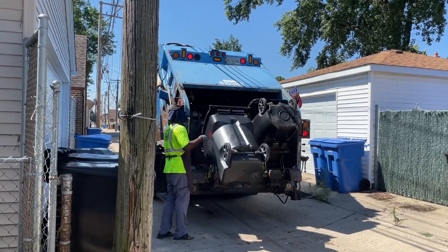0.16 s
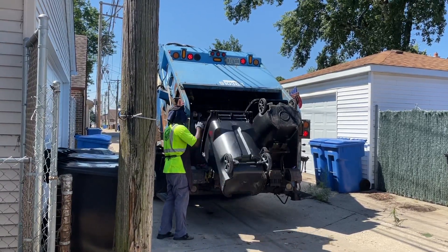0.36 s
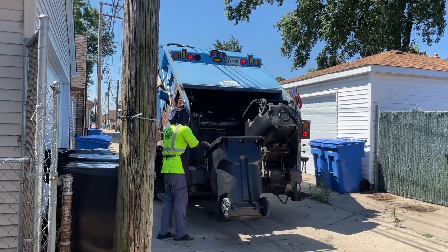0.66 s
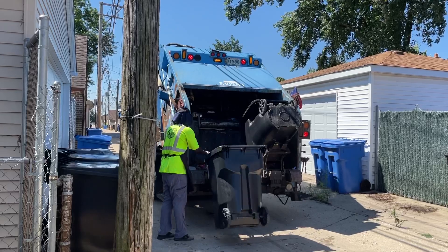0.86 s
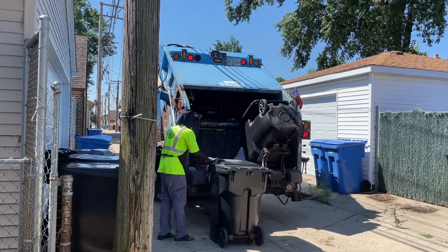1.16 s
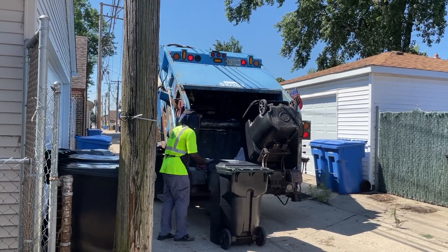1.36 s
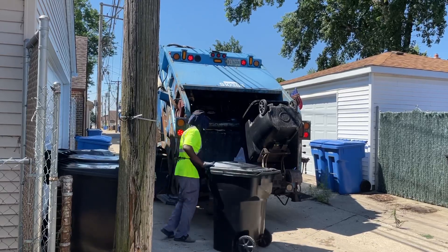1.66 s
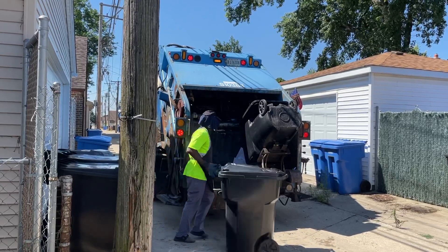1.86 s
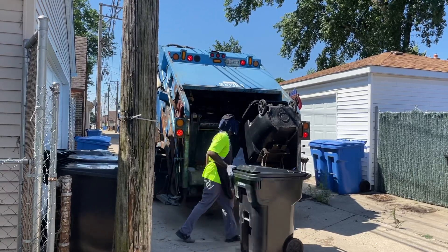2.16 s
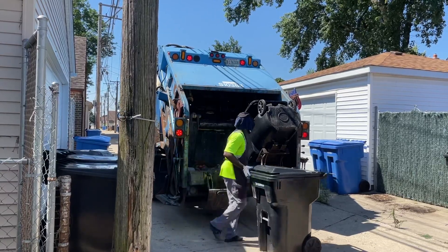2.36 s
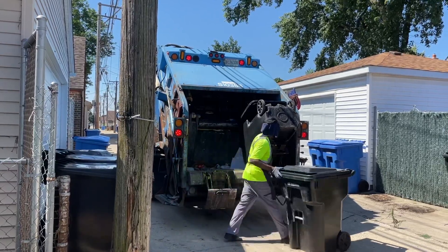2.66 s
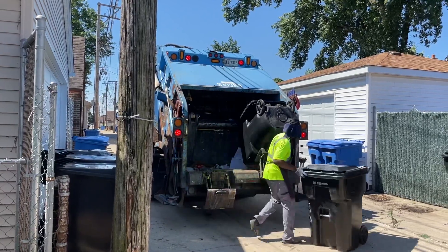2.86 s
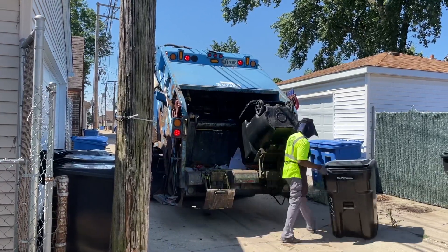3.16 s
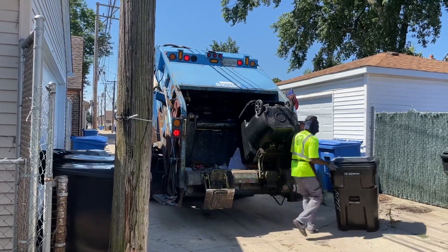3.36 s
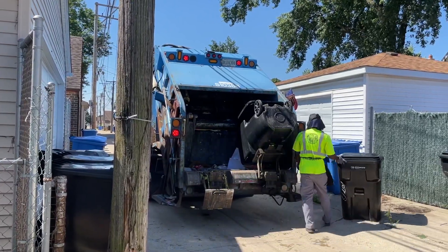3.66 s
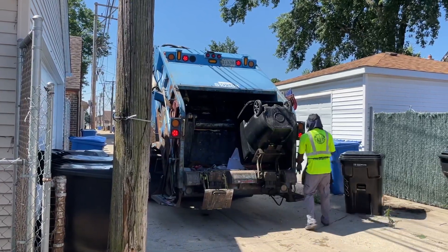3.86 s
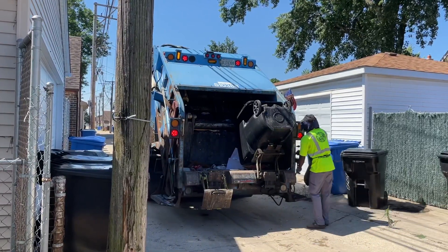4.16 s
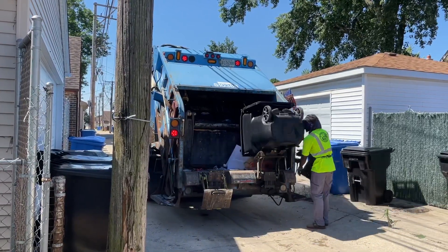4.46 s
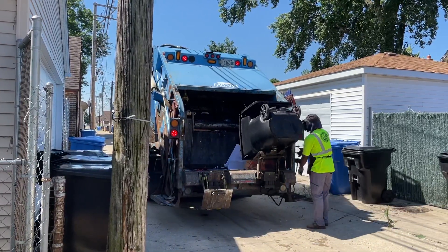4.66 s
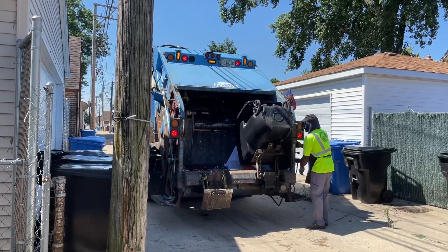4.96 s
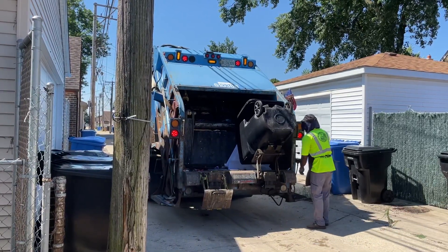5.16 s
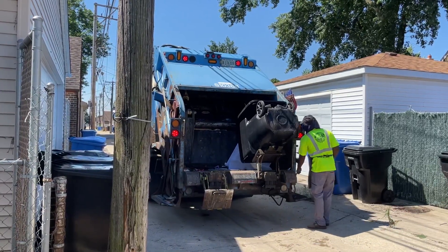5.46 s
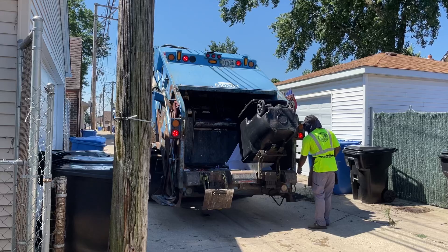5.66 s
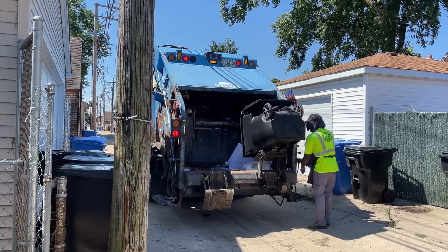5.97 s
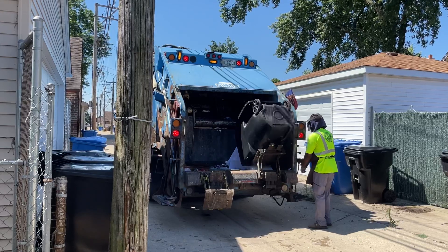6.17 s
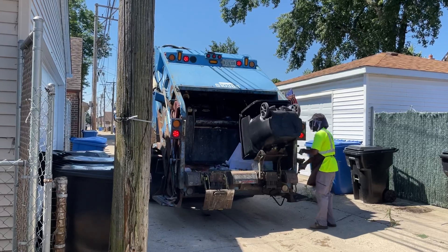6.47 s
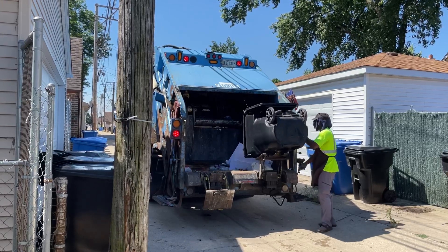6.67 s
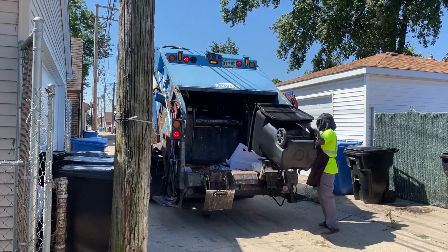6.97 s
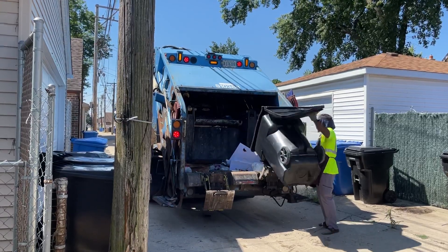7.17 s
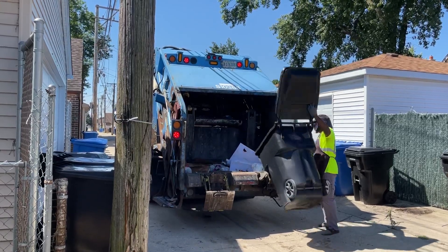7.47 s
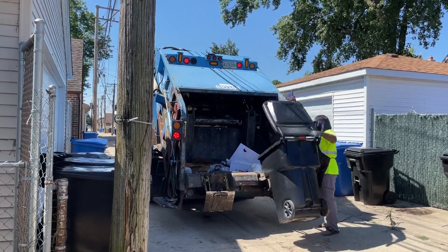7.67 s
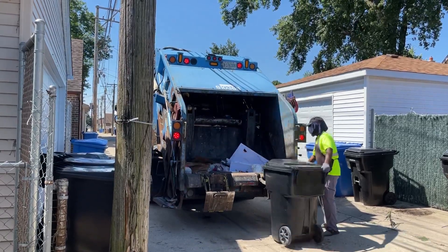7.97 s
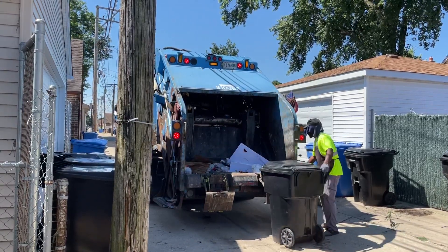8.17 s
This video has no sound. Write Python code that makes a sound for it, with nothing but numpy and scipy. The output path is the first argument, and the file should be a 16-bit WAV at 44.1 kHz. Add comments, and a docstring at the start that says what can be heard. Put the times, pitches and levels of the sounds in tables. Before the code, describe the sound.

A refuse truck's low engine throbs steadily in a narrow alley. A hydraulic pump whines as an emptied plastic cart is lowered and lands with a hard bang. It is wheeled away, rumbling and scraping over rough concrete, then the lifter jolts a second cart with clustered hollow thuds and clanks. After a short calm with rushing oil, that cart lands in two heavy hits. Close stereo microphone, short wall echoes, loud hits slightly ducking the rest.

```python
"""Refuse truck with two carts

A refuse truck idles in an alley while its hydraulic lifter lowers two emptied plastic carts.
The first cart lands and is wheeled over rough concrete; the second is shaken on the hopper, then lands.
Engine, oil rush and rolling are filtered noise; pump whine and squeaks are sines.
Blows and clinks are dying tones and noise bursts, and random echoes make the alley.
Two close microphone ports hear it, with gain control."""
import sys
import numpy as np
from scipy import signal
from scipy.fft import rfft, irfft, next_fast_len
from scipy.io import wavfile
from scipy.ndimage import uniform_filter1d

SR = 44100
rng = np.random.default_rng(int(sys.argv[2]) if len(sys.argv) > 2 else 0)


def wav_record(signal):
    """Record a signal, one row per channel, as 16-bit PCM in the file named by sys.argv[1]."""
    frames = np.transpose(np.atleast_2d(signal))
    bounded = np.clip(frames, -1, 1)
    # unit amplitude maps onto the largest positive 16-bit level
    quanta = np.round(bounded * 32767).astype(np.int16)
    wavfile.write(sys.argv[1], SR, quanta)


def ratio_of_db(decibels):
    """Turn decibels (scalar or array-like) into linear amplitude factors; 0 dB maps to 1."""
    return 10 ** (np.asarray(decibels, float) / 20)


N = 367000  # length in samples


def evened(x):
    """Scales a sound to rms 1."""
    return x / np.sqrt(np.mean(x ** 2) + 1e-20)


def read(points, hz):
    """Reads a table of values over frequency, on a log-frequency axis."""
    f, value = np.transpose(points)
    return np.interp(np.log(hz + 1), np.log(f + 1), value)


def curve(rows):
    """Joins the rows of a table with straight lines over all samples."""
    s, *columns = np.transpose(rows)
    return [np.interp(np.arange(N) / SR, s, c) for c in columns]


def spans(rows):
    """Sums envelopes in dB from rows (start s, rise s, hold s, fall s, dB)."""
    t = np.arange(N) / SR
    total_db = np.zeros(N)
    for s, rise, hold, fall, db in rows:
        corners = s + np.cumsum([0, rise, hold, fall])
        total_db += np.interp(t, corners, [0, db, db, 0])
    return total_db


def add(mix, s, sound):
    """Mixes a sound in at a time in seconds."""
    part = mix[round(s * SR):][:len(sound)]
    part += sound[:len(part)]


def coloured(x, gain):
    """Filters by gain(hz) along the last axis."""
    size = next_fast_len(x.shape[-1])
    spectrum = rfft(x, size) * gain(np.fft.rfftfreq(size, 1 / SR))
    return irfft(spectrum, size)[..., :x.shape[-1]]


def peaks(modes):
    """Gain of steep resonances side by side, from rows (Hz, width Hz, dB)."""
    return lambda hz: np.sqrt(sum(ratio_of_db(2 * db) / (1 + (2 * (hz - f) / w) ** 2) ** 2 for f, w, db in modes))


def lumps(width_s, channels=2):
    """Slow random wander of rms 1, made by smoothing noise twice."""
    size = max(round(width_s * SR), 2)
    noise = rng.standard_normal((channels, N))
    return evened(uniform_filter1d(uniform_filter1d(noise, size), size))


def ring(hz, db, t60, rise_s, sag=0., size=2 ** 14):
    """One dying tone; a large swing starts it sharp by the share sag."""
    t = np.arange(size) / SR
    t60 = max(t60, .004)
    turns = np.cumsum(hz * (1 + sag * ratio_of_db(-120 * t / t60))) / SR
    shape = (1 - np.exp(-t / rise_s)) * ratio_of_db(-60 * t / t60)
    return ratio_of_db(db) * shape / shape.max() * np.sin(2 * np.pi * turns)


def burst(noise, gain, db, rise_s, t60, chatter_db=0.):
    """Coloured noise that rises fast and dies away; loose parts make it chatter."""
    t = np.arange(len(noise)) / SR
    shape = (1 - np.exp(-t / rise_s)) * ratio_of_db(-60 * t / max(t60, .015))
    chatter = evened(uniform_filter1d(uniform_filter1d(noise[::-1], size=120), size=120))
    loosened = np.minimum(t / .012, 1)  # the first contact is firm
    x = coloured(noise, gain) * shape * ratio_of_db(chatter_db * chatter * loosened)
    same_energy = np.sqrt(np.sum(shape ** 2) / np.sum(x ** 2))
    return ratio_of_db(db) * x * same_energy / shape.max()


# Colour of engine and fan noise off the alley walls: f/Hz, relative level/dB per Hz
ENGINE_TONE = [(25, -26), (55, -1), (80, -5.5), (120, -12), (250, -15), (440, -12), (540, -24.5),
               (720, -26), (900, -14.5), (1020, -9), (1160, -19), (1330, -29), (1500, -27.5), (3300, -32),
               (5600, -43), (6500, -61.5), (9000, -42), (15000, -55)]


def engine():
    """Noise that throbs with every firing, each cylinder with its own strength."""
    engine_db, firing_hz = -29.5, 35.8  # overall rms level, mean firing rate
    turns = np.cumsum(firing_hz * (1 + 0.012 * lumps(.3, channels=1)[0])) / SR
    cylinder_db = 2.0 * rng.standard_normal(6)[turns.astype(int) % 6]
    throb = 1 + 0.56 * ratio_of_db(cylinder_db) * np.exp(-(turns % 1) / 0.13)
    noise = throb * rng.standard_normal((2, N))
    return ratio_of_db(engine_db) * evened(coloured(noise, lambda hz: ratio_of_db(read(ENGINE_TONE, hz))))


# Thin tones: long ones whine from the oil pump, short ones are squeaks:
# start t/s, end t/s, mean f/Hz, rms level/dB before wavering
THIN_TONES = [(.17, 1.08, 214, -31), (0, .8, 3240, -51), (3.38, 3.51, 3260, -40), (3.92, 4.1, 3260, -46),
              (4.11, 4.2, 2060, -43), (7.2, 7.9, 150.7, -37), (7.2, 7.9, 301.5, -40), (7.2, 7.9, 452, -43),
              (6.8, 8.3, 3690, -57)]


def whine_and_squeaks():
    """Nearly steady sine tones whose pitch and level waver a little."""
    out = np.zeros(N)
    for start, end, hz, db in THIN_TONES:
        span = slice(round(start * SR), round(end * SR))
        drift, waver = lumps(.012)[:, span]
        turns = np.cumsum(hz * (1 + .004 * drift)) / SR
        tone = np.sin(2 * np.pi * turns) * ratio_of_db(db + 2.0 * waver)
        fade = signal.windows.tukey(len(tone), .15)
        add(out, start, np.sqrt(2) * tone * fade)
    return out


# How the cart is moved: t/s, shaking level/dB, freedom (hanging free +1 .. wheels on concrete -1)
CART_MOTION = [(0.0, -21.5, 0.52), (0.3, -34.5, 0.77), (0.9, -39, 0.86), (1.2, -26, 0), (1.64, -27.5, 0.24),
               (1.83, -21, -0.11), (2.0, -26.5, 0.72), (2.15, -35.5, 0.19), (2.4, -23, -0.094),
               (2.78, -23.5, -0.49), (3.3, -24.5, -1), (3.96, -24.5, -1.1), (4.3, -23, -0.13),
               (4.9, -26.5, 0.036), (5.15, -23.5, .2), (5.4, -25.5, -0.26), (5.5, -33, 0.95),
               (5.75, -24, 0.33), (6.3, -23.5, 0.32), (6.72, -28, 0.15), (7.09, -34, 0.065),
               (7.37, -31, .5), (7.65, -38, -0.45), (8.1, -30, .3), (8.32, -28.5, -0.42)]
# The cart judders in its cradle or over a joint: start t/s, hold length/s, added shaking level/dB
CART_JUDDERS = [(0.038, .07, 4), (1.33, .12, 3), (3.4, 0.084, 4.5), (4.208, .1, 3), (4.46, 0.066, 9),
                (4.59, .13, 5.5), (4.975, 0.1, 8), (5.535, .05, 4.5), (5.628, 0.054, 6), (5.82, .08, 6),
                (6.0, .09, 3), (6.12, .11, 4.5), (6.349, 0.073, 6.5), (6.58, .06, 5.5)]


def shaking():
    """Shaking in dB and freedom of the cart: the slow motion plus the judders."""
    rise_s, fall_s, freed_per_db = 0.0089, 0.027, .05
    judder_db = spans([(s, rise_s, hold, fall_s, db) for s, hold, db in CART_JUDDERS])
    shake_db, free = curve(CART_MOTION)
    return shake_db + judder_db, free + freed_per_db * judder_db


# Resonances of the air in the cart: f/Hz, width/Hz, relative level/dB
CART_AIR = [(61, 32, 5), (88.7, 37, 0.5)]
# Resonances of the cart's bottom: f/Hz, width/Hz, relative level/dB
CART_BOTTOM = [(149, 102, 1), (213, 81, -3)]
# Resonances of the cart's walls: f/Hz, width/Hz, relative level/dB
CART_WALLS = [(310, 230, -2), (440, 270, -0.5), (640, 200, -7), (867, 380, -6.5), (1080, 334, -8),
              (1528, 150, -13.5), (2030, 620, -21)]
# Air, bottom and walls in turn: level over the shaking/dB, level gained per unit of freedom/dB
PART_LEVELS = [(0, 6.5), (0, -3.5), (-1.5, -2)]


def rolling():
    """Bumps of uneven size keep the air, bottom and walls of the cart ringing."""
    uneven_db = np.array([3.0 * lumps(0.01, channels=1),
                          2.8 * lumps(0.008, channels=1),
                          3.0 * lumps(0.004, channels=1)])
    bumps = rng.standard_normal((3, 2, N)) * ratio_of_db(uneven_db)
    shake_db, free = shaking()
    out = np.zeros((2, N))
    for (db, free_db), x, modes in zip(PART_LEVELS, bumps, (CART_AIR, CART_BOTTOM, CART_WALLS)):
        out += ratio_of_db(shake_db + db + free_db * free) * evened(coloured(x, peaks(modes)))
    return out


# Colour of the oil rush: f/Hz, relative level/dB per Hz
RUSH_TONE = [(1200, -16.5), (2000, 1.5), (3600, 1.5), (5600, -5.5), (6500, -5), (8000, -7), (10000, -24)]
# Colour of the thin top, also used for ticks: f/Hz, relative level/dB per Hz
TREBLE_TONE = [(5000, -25), (7500, -45), (9000, 6), (11000, 2), (14300, 1.5), (15700, -18)]
# Scrapes and rushes: start t/s, length/s, peak level over the steady rush/dB, share spent swelling
RUSH_SWELLS = [(0.302, .5, 2, 0.61), (1.299, 0.78, 8.5, 0.59), (2.449, 0.51, 5, 0.43),
               (3.0, 0.28, 1.5, 0.44), (3.804, 0.76, 13, 0.62), (4.5, .45, 10.5, 0.21),
               (4.955, 0.6, 12, 0.08), (6.0, 0.72, 7.5, .6)]
# Valves held open: opening t/s, closing t/s, level over the steady rush/dB
OPEN_VALVES = [(0, 1.053, 5), (6.546, 7.95, 8.5), (8.04, 8.4, 7.5)]
# The thin top flares: start t/s, hold length/s, added level/dB
TOP_FLARES = [(2.125, .11, 6), (4.958, .3, 4)]


def hiss():
    """Broad rushing noise and a thin top flicker together and swell with rushes, valves and shaking."""
    rush_base_db, top_base_db, top_per_swell = -44, -57.5, 1.5  # last: top dB per rush dB
    valve_s = 0.13  # opening and closing time
    grit_per_shake, still_db = 0.12, -33  # hiss dB per dB of shaking above a still cart
    flicker_db = 1.2 * lumps(0.0029, channels=1) + 1.1 * lumps(.03, channels=1)
    rush_noise, top_noise = rng.standard_normal((2, 2, N)) * ratio_of_db(flicker_db)
    shake_db, _ = shaking()
    rush_db = spans([(s, rise * length, 0, (1 - rise) * length, db) for s, length, db, rise in RUSH_SWELLS])
    valve_db = spans([(a, valve_s, b - a - valve_s, valve_s, db) for a, b, db in OPEN_VALVES])
    flare_db = spans([(s, .01, hold, .4 * hold, db) for s, hold, db in TOP_FLARES])
    swell_db = rush_db + valve_db + grit_per_shake * (shake_db - still_db)
    rush = evened(coloured(rush_noise, lambda hz: ratio_of_db(read(RUSH_TONE, hz))))
    top = evened(coloured(top_noise, lambda hz: ratio_of_db(read(TREBLE_TONE, hz))))
    return ratio_of_db(rush_base_db + swell_db) * rush + ratio_of_db(top_base_db + top_per_swell * swell_db + flare_db) * top


def rattle():
    """Loose lid, bar and wheels knock densely at random, harder the more the cart shakes."""
    struck = rng.random(N) < 200 / SR  # about 200 knocks a second
    size = ratio_of_db(3.8 * np.minimum(rng.exponential(1, N), 3)) * struck
    kind, out = rng.integers(0, 24, N), np.zeros(N)
    for k, (u, v) in enumerate(rng.random((24, 2))):
        hz = 450 * 6.7 ** u
        knock = ring(hz, -7 * u, (8 + 11 * v) / hz, .0004, size=3000)
        out += signal.oaconvolve(size * (kind == k), knock)[:N]
    shake_db, free = shaking()
    return ratio_of_db(1.2 * shake_db - 5.5 - 2.4 * free) * evened(out)


# Blows on the cart: t/s, force level/dB, thud f/Hz, thud level over force/dB, crack level over force/dB
# (all levels relative)
CART_BLOWS = [(0.01, -7.5, 238, -25, -37), (0.03, -7, 354.5, -8, -38), (0.187, -17, 62, -11, -25),
              (0.243, -18.5, 65, -20, -38), (1.082, 1, 200, -7, -25.5), (1.381, -35, 78, 16, -9),
              (1.554, -33, 73.6, 13.5, -4), (1.734, -21, 54, -12, -18), (1.892, -24, 110, 10, -25),
              (1.917, -17, 56, -5, -17), (2.13, -28.5, 136, 8.5, -15), (2.226, -1, 371, -9, -25),
              (2.263, -5, 355.4, -4.5, -45), (2.305, -11, 126, -5, -40), (2.604, -30.5, 181, 10, -3),
              (2.718, -29.5, 165, -6, -4.5), (2.979, -14, 114, -1, -23.5), (3.1, -26.5, 169, 3.5, -11),
              (3.16, -22, 119.5, -2, -20), (3.22, -26, 65, 2, -23), (3.284, -24, 279, 6.5, -13.5),
              (3.403, -10, 177, -5, -18.5), (3.622, -7.5, 241.6, 0, -20), (3.684, -10, 129, -2, -18),
              (3.794, -9, 320, -18, -19), (3.937, -13, 67, -4, -23), (4.222, -12, 59, -6, -18.5),
              (4.272, -20, 75, 11, -24), (4.462, -3, 147.7, -8, -19), (4.482, -8, 200, -8, -16.5),
              (4.593, -12.5, 70, -8, -17), (4.688, -7, 54.4, -5, -18), (4.971, -13.5, 183, -6, -20.5),
              (5.047, -17, 100, 1, -12), (5.536, -15, 48, -15, -16.5), (5.635, -8, 157, -5, -25),
              (5.69, -26.5, 97, -2, -4.5), (5.778, -20, 120, -4, -18), (5.818, -6.5, 83.2, -6, -16),
              (5.857, -13, 67, -1, -14), (6.02, -15.5, 59.6, -2, -21), (6.065, -20, 90, -4, -14),
              (6.118, -8.5, 54, -0.5, -13), (6.185, -7, 213, -6.5, -28), (6.302, -14, 86, -10, -16.5),
              (6.372, -13, 82.5, -11, -12), (6.579, -14, 54, 3, -18.5), (6.626, -21, 210, 1, -9.5),
              (6.888, -21, 115, 17, -25), (7.4, -20.5, 149.5, -1.5, -25), (7.899, -2.5, 300, -11.5, -18.5),
              (7.937, -21.5, 170, 5.5, -15), (8.025, 2.5, 270, -5, -25), (8.243, -13, 114.5, -1.5, -28),
              (8.303, -16.5, 105, -10, -23)]
# Colour of the crack: f/Hz, relative level/dB per Hz
CRACK_TONE = [(700, -21), (1500, 0), (2500, -2.5), (4000, -4), (5600, -9.5), (9000, -12), (12000, -19.5),
              (15500, -25)]


def blows():
    """Each blow is a thud, ringing walls and a crack; a soft blow starts slowly and lasts."""
    hard_t60_s, softer_s_per_db, longest_t60_s = 0.066, .005, 0.16
    ripple_depth_db = 4.5
    out = np.zeros(N)
    noise = rng.standard_normal((len(CART_BLOWS), 3, 2 ** 14))
    chance = rng.random((len(CART_BLOWS), 2))
    for (s, db, hz, thud_db, crack_db), (a, b, c), (u, v) in zip(CART_BLOWS, noise, chance):

        def crack_gain(f):
            """Ripples the crack's colour at random, so each blow cracks a little differently."""
            ripple_db = ripple_depth_db * np.cos(2 * np.pi * (np.sqrt(f) / (7 + 6 * u) + v))
            return ratio_of_db(read(CRACK_TONE, f) + ripple_db)

        t60 = np.clip(hard_t60_s - softer_s_per_db * (db + 1.6 * max(thud_db, 0)), .03, longest_t60_s)
        add(out, s, ring(hz, db + thud_db - 4, t60, 0.21 * t60, sag=0.692))
        add(out, s, burst(a, peaks(CART_AIR + CART_BOTTOM), db + thud_db - 4.5, 0.095 * t60, 1.41 * t60))
        add(out, s, burst(b, peaks(CART_WALLS), db - 5, 0.031 * t60, 1.1 * t60, chatter_db=4))
        add(out, s, burst(c, crack_gain, db + crack_db + 4, 0.022 * t60, 0.95 * t60, chatter_db=4.5))
    return out


# Clinks: t/s, relative level/dB, struck part f/Hz, least relative level of bright modes/dB
STEEL_CLINKS = [(0.012, -7, 955, -40), (0.0365, -15, 3480, -50), (0.1885, -13.5, 1000, -45),
                (0.2445, -9, 1000, -40), (0.288, -15, 1000, -42), (1.0816, 1, 1050, -30),
                (1.555, -21, 2040, -34), (2.2294, -10, 1500, -24), (2.403, -18, 1560, -30),
                (2.7193, -15, 1340, -30), (2.9797, -12, 1100, -31), (3.2211, -16, 1560, -30),
                (3.6227, -12, 3480, -28), (3.626, -13, 1110, -40), (3.7963, -10, 2050, -15),
                (3.937, -14, 1143, -36), (4.2228, -12, 980, -26), (4.462, -7, 1070, -22),
                (4.4868, -7, 1560, -27), (4.599, -9, 1000, -24), (4.6898, -10, 1340, -27),
                (4.702, -13, 4750, -45), (5.6371, -14, 1340, -28), (5.8165, -4, 1173, -21),
                (5.8532, -13, 2800, -23), (6.119, 0, 1560, -22), (6.12, -7, 3700, -28),
                (6.3884, -12, 2750, -24), (6.58, -11, 1350, -24), (7.9025, -1, 1150, -16),
                (7.904, -7, 2150, -30), (8.002, -19, 1600, -45), (8.0252, -3, 1100, -18),
                (8.027, -9, 1860, -24), (8.056, -14, 1560, -34)]
# Steel modes of the lifter, latch and axle: f/Hz, relative level/dB, t60/s
STEEL_MODES = [(980, 2, 0.048), (1080, 0, 0.06), (1161, 0.5, 0.075), (1340, -1.5, 0.071), (1560, 1.5, .047),
               (1860, -1, .05), (2040, 0, 0.055), (2330, 1, 0.032), (2560, -1, .035), (2800, -5, 0.047),
               (3040, -2, .04), (3280, -1, .035), (3480, 0, .04), (3700, -3, 0.035), (4200, -4, .03),
               (4750, -6, .04), (5250, -4, .03)]


def clinks():
    """Steel modes near the struck part, bright modes and rough neighbours ring, with one rebound."""
    away_db_per_octave = 70  # modes away from the struck part ring less
    bright_from_hz = 2200
    out = np.zeros(N)
    chance = rng.random((len(STEEL_CLINKS), 2 + len(STEEL_MODES)))
    noise = rng.standard_normal((len(STEEL_CLINKS), 2 ** 13))
    for (s, db, part_hz, bright_db), (u, v, *spread), a in zip(STEEL_CLINKS, chance, noise):
        clink, levels, rough_modes = np.zeros(2 ** 13), [], []
        for (hz, mode_db, t60), w in zip(STEEL_MODES, spread):
            near_db = db - away_db_per_octave * abs(np.log2(hz / part_hz))
            level = mode_db + max(near_db, bright_db if hz > bright_from_hz else -90)
            weaker_db = 10 * w * min((db - near_db) / 6, 1)  # chance grows away from the struck part
            clink += ring(hz, level - 6.5 - weaker_db, t60, 0.001, size=2 ** 13)
            levels.append(level)
        for (hz, _, _), level in zip(STEEL_MODES, levels):
            rough_modes.append((hz, 0.13 * hz, level - max(levels)))
        clink += burst(a, peaks(rough_modes), max(levels) - 11.5, .0015, 0.065, chatter_db=3.5)
        add(out, s, clink)
        add(out, s + 0.0095 + 0.009 * u, ratio_of_db(-6 - 6.2 * v) * clink)  # rebound
    return out


# How fast echoes die: f/Hz, t60/s
ECHO_DECAY = [(100, 0.25), (400, 0.51), (1500, 0.3), (5000, 0.38), (15000, 0.062)]


def alley(x):
    """Sparse echoes of random sign between alley walls, each band dying at its own speed."""
    taps = np.zeros((2, SR // 2))
    at = np.arange(300, SR // 2 - 20, 20) + rng.integers(0, 20, (2, (SR // 2 - 301) // 20))
    np.put_along_axis(taps, at, rng.choice([-1., 1.], at.shape), 1)
    hz, t, z = signal.stft(taps, SR, nperseg=256)
    t60 = np.maximum(read(ECHO_DECAY, hz), .03)[:, None]
    tail = signal.istft(z * ratio_of_db(-60 * t / t60), SR, nperseg=256)[1]
    return signal.fftconvolve(x[None], tail / np.linalg.norm(tail[0]), axes=1)[:, :N]


# Resonances of the cart's heel on concrete: f/Hz, width/Hz, relative level/dB
HEEL_MODES = [(480, 200, -2), (1010, 260, 0), (1500, 300, -8), (2030, 240, -4), (2650, 500, -13),
              (3400, 500, -15)]
# The cart is dragged: start t/s, length/s, peak level/dB (0 is silent), share spent swelling
CART_DRAGS = [(1.42, .28, 9, .4), (1.66, .38, 18, .35), (2.3, 1.1, 10, .3), (3.2, 1.0, 11, .4),
              (4.57, .13, 18, .3), (5.1, .35, 10, .5), (6.33, .12, 16, .4), (7.875, .13, 20, .25),
              (8.03, .12, 18, .2)]


def dragging():
    """Dense grit under the heel keeps its resonances sounding."""
    uneven_db = 3.0 * lumps(.003, channels=1) + 2.2 * lumps(.015, channels=1)
    grit = rng.standard_normal((2, N)) * ratio_of_db(uneven_db)
    drag_db = spans([(s, rise * length, 0, (1 - rise) * length, db) for s, length, db, rise in CART_DRAGS])
    pressure = ratio_of_db(drag_db) - 1  # silent between drags
    return ratio_of_db(-44) * pressure * evened(coloured(grit, peaks(HEEL_MODES)))


# Thin bright ticks of grit and loose scraps: t/s, relative level/dB
GRIT_TICKS = [(1.462, -26), (1.9641, -25), (2.1273, -24), (2.5582, -28), (2.6041, -22), (2.7179, -17.5),
              (3.0801, -24), (3.34, -33), (3.4033, -27), (3.6217, -22), (3.6887, -16), (4.459, -24),
              (4.5971, -15), (5.534, -23), (6.1167, -31), (6.3726, -24), (6.631, -23)]


def ticks():
    """Very short bursts of treble noise with strong chatter."""
    out = np.zeros(N)
    for (s, db), a in zip(GRIT_TICKS, rng.standard_normal((len(GRIT_TICKS), 2 ** 13))):
        add(out, s, burst(a, lambda f: ratio_of_db(read(TREBLE_TONE, f)), db - 8.5, 0.00063, .04, chatter_db=6.0))
    return out


# Tones of a ringing scrap: f/Hz, level/dB, t60/s
SCRAP_TONES = [(6440, -38, 0.22), (10600, -37, .15), (12400, -44, .15), (14400, -29, .1)]


def jingle():
    """A scrap rings once: a few high tones start together and die away."""
    out = np.zeros(N)
    add(out, 4.594, sum(ring(hz, db, t60, .004) for hz, db, t60 in SCRAP_TONES))
    return out


def scene():
    """Row 0: sound common to both ports; row 1: unrelated sound from the sides."""
    hits = blows() + rattle()
    steel = clinks() + ticks() + jingle()
    wet = alley(hits + ratio_of_db(-8) * steel)  # the truck body screens the steel from the walls
    common = hits + steel + ratio_of_db(-7.0) * wet[0] + whine_and_squeaks()
    sides = ratio_of_db(-4.5) * wet[1]
    return np.array([common, sides]) + engine() + rolling() + dragging() + hiss()


# Port difference over port sum: f/Hz, level/dB
DIFFERENCE = [(40, -13), (200, -9), (350, -10), (650, 0.5), (1050, -5.5), (1800, -3), (3200, -1.5),
              (4300, -4.5), (5500, 4), (6600, -6.5), (7400, 7), (8000, 16.5), (9400, 16), (10300, 4),
              (12000, -5), (15000, -33)]
# Share of the difference due to port delay: f/Hz, share
DELAY_SHARE = [(50, .7), (500, .5), (2000, .4), (5000, .3), (8500, .5), (15000, .5)]


def two_ports(dry):
    """Port delay turns part of the sum into difference; the rest comes from the sides."""
    angle = lambda hz: np.arctan(ratio_of_db(read(DIFFERENCE, hz)))
    locked = lambda hz: np.clip(read(DELAY_SHARE, hz), 0, 1)
    mid = coloured(dry[0], lambda hz: np.cos(angle(hz)))
    side = coloured(dry[0], lambda hz: 1j * np.sin(angle(hz)) * locked(hz))
    side += coloured(dry[1], lambda hz: np.sin(angle(hz)) * np.sqrt(1 - locked(hz) ** 2))
    ports = np.array([mid + side, mid - side]) * ratio_of_db([[-.35], [.35]])
    # the capsules lose deep bass
    return signal.sosfilt(signal.butter(4, 38, "high", fs=SR, output="sos"), ports)


def ducked(x):
    """Gain control: smoothed loudness above a threshold turns the gain down a moment later."""
    threshold_db, db_per_db_above = -22.5, 0.23
    keep = np.exp(-1 / (.06 * SR))  # two smoothing stages of 0.06 s each
    power = signal.lfilter([(1 - keep) ** 2], [1, -2 * keep, keep ** 2], (x ** 2).mean(0))
    above_db = np.maximum(10 * np.log10(power + 1e-12) - threshold_db, 0)
    return x / ratio_of_db(db_per_db_above * above_db)


def top_cut(x):
    """Nothing passes above the cut-off."""
    return signal.sosfilt(signal.butter(12, 15790, fs=SR, output="sos"), x)


def record(dry):
    """Two ports pick up the scene; gain control ducks loud sounds; peaks round off."""
    rounded = np.tanh(ducked(two_ports(dry)))
    return top_cut(rounded)


dry = scene()
out = record(dry)
wav_record(out)
```